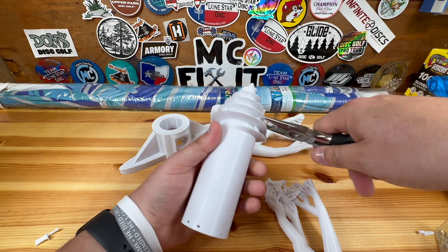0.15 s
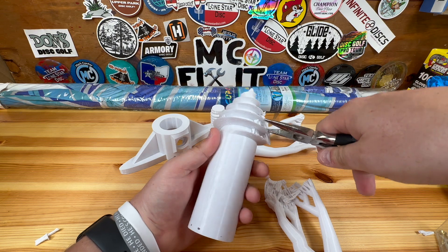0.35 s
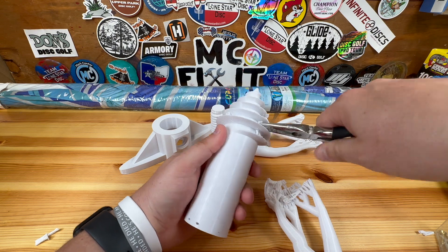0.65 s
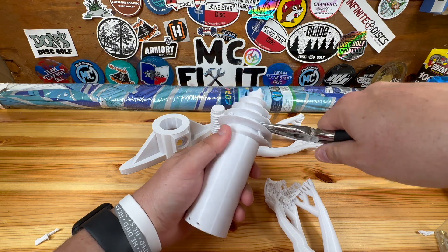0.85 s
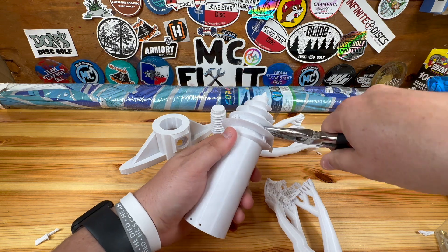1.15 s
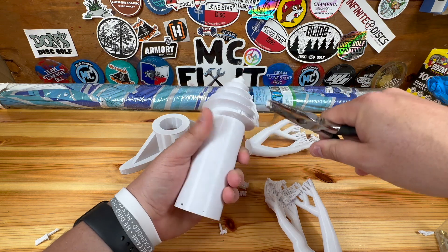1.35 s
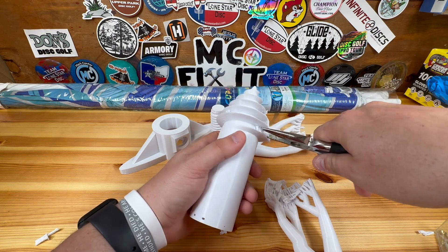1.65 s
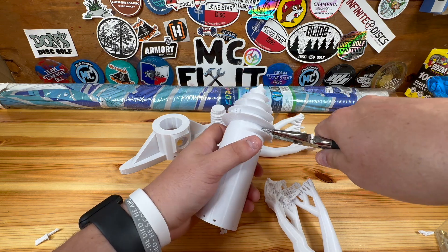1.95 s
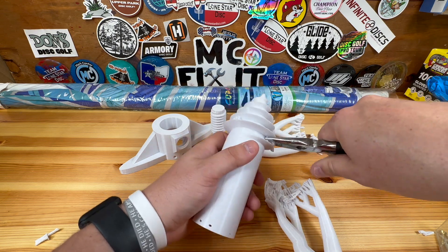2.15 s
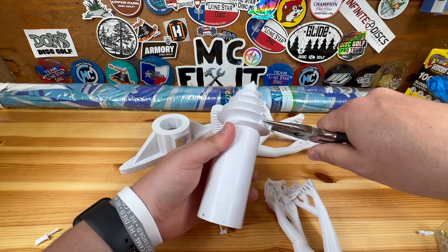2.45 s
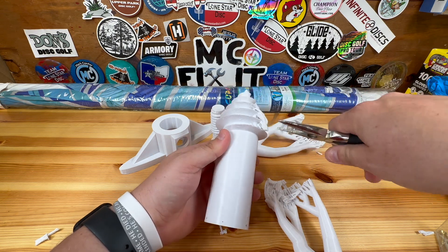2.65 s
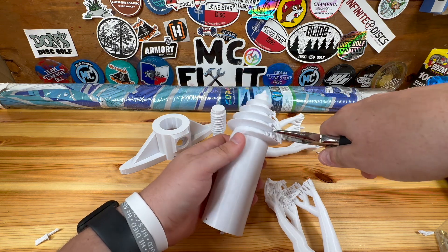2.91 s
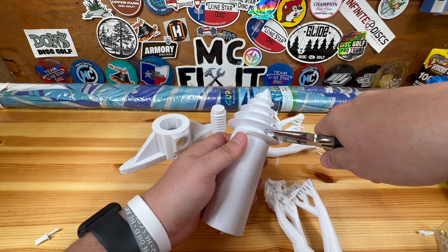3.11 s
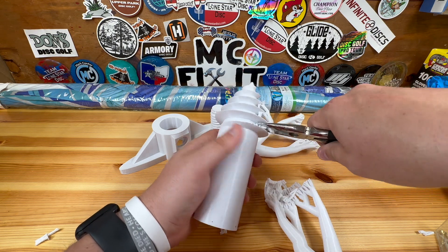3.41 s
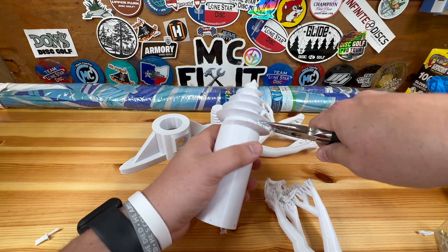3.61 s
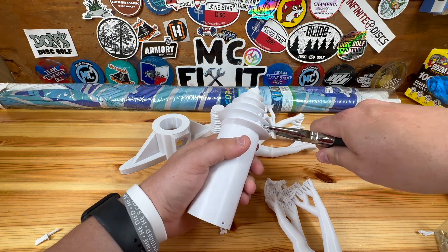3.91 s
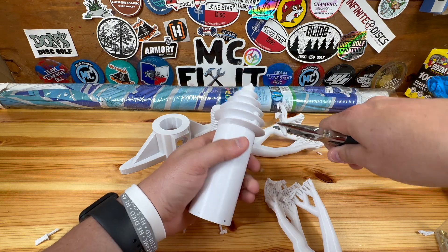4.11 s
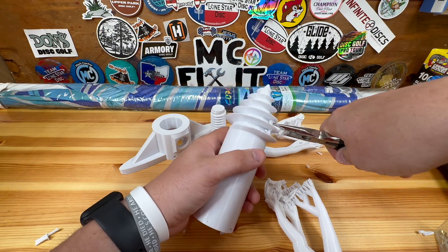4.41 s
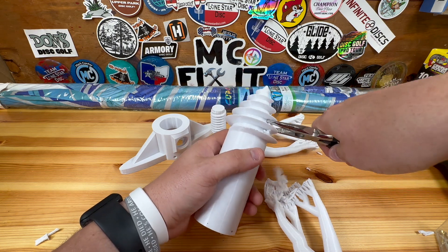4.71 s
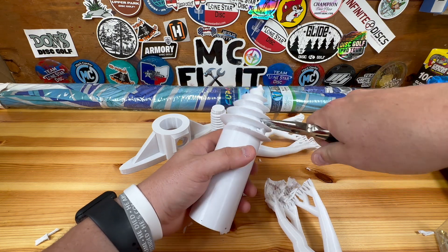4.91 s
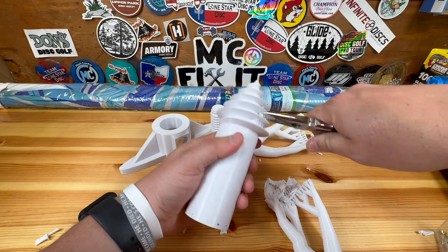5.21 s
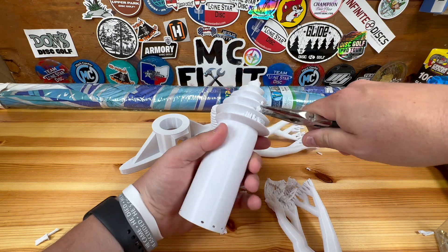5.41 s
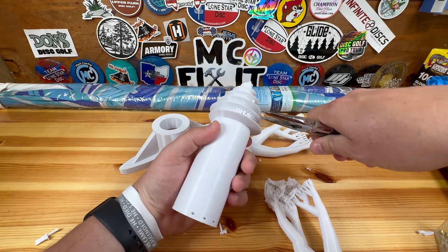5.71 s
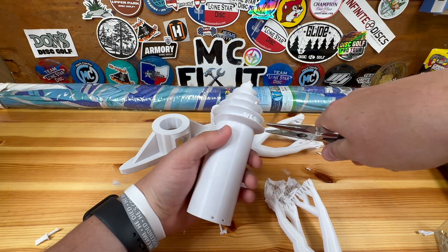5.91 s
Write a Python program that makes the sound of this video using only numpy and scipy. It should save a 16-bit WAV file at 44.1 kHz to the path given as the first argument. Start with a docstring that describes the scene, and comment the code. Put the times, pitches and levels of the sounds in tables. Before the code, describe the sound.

Close stereo pickup at a wooden workbench: pliers bite and twist thin plastic supports off a hollow tube. Quiet ticks come first, then sharp bright snaps in irregular clusters with pauses between, each with a short hollow knock. Jaws scrape over ridges, bent plastic creaks briefly, and loose bits tap. Faint low hum and soft room noise stay underneath, with a short woody echo.

```python
"""Over a faint machine hum and soft room noise, pliers bite, twist and snap brittle plastic
supports off a hollow printed tube, close to a two-port microphone.
Each break is a burst of tiny cracks ringing fins and tube wall; knocks ring the air in the tube.
Stick-slip friction makes the jaws scrape over the ridges and bent supports creak; loose bits tap.
A wooden bench and wall return a short echo, built from decaying noise."""
import sys
import numpy as np
from scipy import signal
from scipy.fft import rfft, irfft
from scipy.io import wavfile
from scipy.ndimage import uniform_filter1d

SR = 44100
rng = np.random.default_rng(int(sys.argv[2]) if len(sys.argv) > 2 else 0)


def voltage_ratio(level):
    """Linear amplitude factor for a level in decibels (scalar or array-like)."""
    return 10 ** (np.asarray(level, float) / 20)


def digitize_waveform(pressure):
    """Quantize a signal to 16-bit integers and store it at the path in sys.argv[1].

    Rows of a 2-D input are taken as channels; values are limited to [-1, 1].
    """
    field = np.atleast_2d(pressure).T
    bounded = np.clip(field, -1, 1)
    quanta = np.round(bounded * 32767).astype(np.int16)
    wavfile.write(sys.argv[1], SR, quanta)


N = 267246

# Source near the plastic: level of left port over right/dB, lead of left port/ms
LEFT_DB, LEFT_LEAD_MS = -1.5, 0.14


def curve(rows):
    """Linear interpolation: the columns of a table as values for every sample."""
    s, *columns = np.transpose(rows)
    return [np.interp(np.arange(N) / SR, s, c) for c in columns]


def through(x, response):
    """Convolution: sound passed through an impulse response."""
    x, response = np.atleast_2d(x), np.atleast_2d(response)
    return signal.fftconvolve(x, response, axes=1)[:, :N]


def colour(x, points):
    """Minimum-phase filtering: a causal filter from the cepstrum of a log gain given as (f/Hz, gain/dB)."""
    hz, db = np.transpose(points)
    size = 4096
    bin_hz = np.arange(size // 2 + 1) * SR / size
    log_gain = np.interp(np.log(bin_hz + 1), np.log(hz), db) * np.log(10) / 20
    cepstrum = irfft(log_gain)
    # folding the negative times onto the positive ones makes it causal
    cepstrum[1:size // 2] *= 2
    cepstrum[size // 2 + 1:] = 0
    return through(x, irfft(np.exp(rfft(cepstrum))))


def unit(x):
    """Normalisation: scaled to rms 1."""
    return x / np.sqrt(np.mean(x ** 2))


def unit_energy(x):
    """Normalisation: each port scaled to energy 1."""
    return x / np.sqrt(np.sum(x ** 2, axis=1, keepdims=True))


def decay(t, t60):
    """Exponential damping: amplitude falls 60 dB in t60 seconds."""
    return np.exp(-np.log(1000) * t / t60)


def walk(rate):
    """Slow random modulation: levels held 1 / rate s and slewed twice; rms 1."""
    k = int(SR / rate)
    steps = np.repeat(rng.standard_normal(N // k + 1), k)
    slewed = uniform_filter1d(uniform_filter1d(steps, k), k)
    return unit(slewed[:N])


def modes(rows, phase_spread=0.3):
    """Modal superposition: damped sines, each with its own phase (spread in rad) at each port; energy 1."""
    t = np.arange(0, max(row[-1] for row in rows), 1 / SR)
    out = 0
    for hz, db, t60 in rows:
        phase = phase_spread * rng.standard_normal((2, 1))
        out = out + voltage_ratio(db) * np.sin(2 * np.pi * hz * t + phase) * decay(t, t60)
    onset = np.minimum(t / 0.00081, 1)
    return unit_energy(out * onset)


def held(rows, detune, spread_db):
    """Perturbed boundary conditions: the same modes, each a little off in pitch, strength and damping."""
    draws = rng.standard_normal((len(rows), 3))
    return [(hz * (1 + detune * p), db + spread_db * g, t60 * voltage_ratio(d))
            for (hz, db, t60), (p, g, d) in zip(rows, draws)]


def swell(ms):
    """Transient force: runs up for ms (at least 0.3), then dies away; peak near 1."""
    x = np.arange(SR // 16) / SR / (max(ms, 0.3) / 1000)
    return (x * np.exp(1 - x)) ** 1.23


def splinters(shape, spread_db):
    """Brittle fracture: dense micro-cracks with a long-tailed spread of sizes; rms 1."""
    return unit(rng.standard_normal(shape) * voltage_ratio(spread_db * rng.exponential(size=shape)))


def stick_slip(rate, spread_db, ms, drag):
    """Stick-slip friction: ridges let go at random, rate per s, with small jerks over a steady drag."""
    released = rng.random(N) < rate / SR
    slips = released * voltage_ratio(spread_db * np.minimum(rng.exponential(size=N), 3.0))
    force = unit(through(slips, swell(ms))[0] + drag)
    return splinters(N, spread_db=2.0) * force


def blow(ms, rows, phase_spread):
    """Impact excitation: a chattering push, rising for ms, drives the modes; energy 1."""
    push = rng.standard_normal(SR // 16) * swell(ms)
    return unit_energy(through(push, modes(rows, phase_spread)))


def add(line, burst, s, pan_db, lead_ms):
    """Level and time difference: places a burst on both ports, pan and lead given for left over right."""
    burst = np.broadcast_to(burst, (2, burst.shape[-1]))
    for port, side in enumerate((1, -1)):
        # nothing starts before 0, so there only the right port's half of the lead remains
        at = max(int(s * SR - side * lead_ms * SR / 2000), 0)
        line[port, at:at + burst.shape[1]] += (burst[port] * voltage_ratio(side * pan_db / 2))[:N - at]


# Spectrum of the room noise, only its shape counts: f/Hz, relative level/dB
ROOM_NOISE = [(15, -29.5), (25, -11.5), (97, -2.5), (146, 0.5), (242, -11), (331, -3.5), (562, -12.5),
              (716, -9), (1050, -32), (1500, -26), (3700, -36.5), (6600, -49.5), (8000, -45.5),
              (17600, -120)]
# Wavering hum tones: f/Hz, rate of wavering/Hz, level/dB
HUM_TONES = [(59.7, 30, -65), (149.9, 24, -58)]
# Level of a further 128 Hz motor tone that sets in late, before its wavering: t/s, level/dB
MOTOR_LEVEL = [(0, -104), (4.7, -100), (5.0, -58), (6.06, -58.5)]


def workshop():
    """Broadband noise and amplitude-modulated tones: soft room noise and narrow wavering hums."""
    mid, side = rng.standard_normal((2, N))
    ports = np.array([[1], [-1]])
    swells_db = 1.9 * walk(4.3)
    out = voltage_ratio(-56.5 + swells_db) * unit(colour(mid + 0.72 * side * ports, ROOM_NOISE))
    t = np.arange(N) / SR
    for hz, width, db in HUM_TONES:
        common = walk(width) * np.sin(2 * np.pi * hz * t)
        opposed = 0.3 * ports * walk(width) * np.cos(2 * np.pi * hz * t)
        out = out + voltage_ratio(db) * np.sqrt(2) * (common + opposed)
    motor_db = curve(MOTOR_LEVEL)[0] + 2.0 * walk(13)
    return out + voltage_ratio(motor_db) * np.sqrt(2) * np.sin(2 * np.pi * 128 * t)


def echo(t60, db):
    """Diffuse reflection: decaying noise, different at each port, fading in over 2.9 ms."""
    t = np.arange(SR // 2) / SR
    tail = rng.standard_normal((2, len(t))) * decay(t, t60) * np.minimum(t / 0.0029, 1)
    return voltage_ratio(db) * unit_energy(tail)


def space():
    """Room impulse response: the direct sound, then bench echo and room tail."""
    reflections = echo(t60=0.06, db=-9) + echo(t60=0.21, db=-17)
    # small clutter scatters the treble more than the bass
    response = signal.lfilter(*signal.butter(1, 1000, "high", fs=SR), reflections)
    response[:, 0] += 1
    return response


# Loose bits and jaw tips tapping the part: t/s, level/dB, f/Hz
TAP_NOTES = [(.126, -52, 2200), (0.356, -47, 1360), (0.522, -41, 2320), (1.852, -49.5, 1800),
             (2.828, -37.5, 2230), (2.845, -29.5, 2440), (2.854, -44, 2390), (2.866, -39, 2590),
             (2.973, -32.5, 2385), (2.999, -35, 2130), (4.89, -34.5, 4040), (5.783, -37.5, 1127),
             (5.847, -42.5, 2810), (5.897, -39.5, 1125), (5.933, -47, 1980), (5.951, -54.5, 1460),
             (5.984, -47.5, 2300), (6.017, -47, 1300), (6.027, -44, 2520)]


def taps():
    """Impact on a damped resonator: each quick contact rings a close pair of modes."""
    contact_ms, t60 = 0.91, 0.021
    out = np.zeros((2, N))
    for s, db, hz in TAP_NOTES:
        note = blow(contact_ms, [(hz, 0, t60), (1.1 * hz, -4, t60)], 0.53)
        note = note * voltage_ratio(db) / np.abs(note).max()
        add(out, note, s - contact_ms / 1000, LEFT_DB, LEFT_LEAD_MS)
    return out


# Creaks of a bent support: start t/s, length/s, level/dB
CREAK_TIMES = [(3.082, 0.082, -52.5), (4.005, 0.015, -40), (4.704, 0.0364, -34), (4.745, .07, -46),
               (4.815, 0.018, -28), (4.865, 0.041, -39)]
# Modes of the support: f/Hz, relative level/dB, t60/s
SUPPORT_MODES = [(1402, 2.5, 0.058), (1570, -5.5, 0.054), (2497, -10, 0.035)]


def creaks():
    """Stick-slip oscillation: quick jerks, strongest near the start, ring the bending support."""
    force, t = np.zeros((2, N)), np.arange(N) / SR
    for s, length, db in CREAK_TIMES:
        fade = np.clip(np.minimum((t - s) / 0.0027, (s + length - t) / length), 0, 1)
        jerks = stick_slip(260, spread_db=4.0, ms=1.2, drag=0.6)
        add(force, voltage_ratio(db) * fade * jerks, 0, LEFT_DB, LEFT_LEAD_MS)
    return through(force, modes(SUPPORT_MODES))


# Jolts of the tube: t/s near the peak, relative level/dB, thud of the hand over it/dB
JOLTS = [(0.041, -45, 8), (.128, -40.5, 6.5), (.176, -49, 9), (0.205, -25.5, -13), (.4298, -39.5, -19),
         (0.4861, -35.5, 5), (0.6371, -35.5, 2.5), (0.6604, -25.5, -43), (0.8655, -17.5, -7.5),
         (0.9856, -29.5, -17), (1.0922, -14.5, -39), (1.1884, -16, -36), (1.2524, -33, -9),
         (1.6072, -36, -14), (1.6785, -38.5, 10.5), (1.855, -48, 4.5), (2.009, -31.5, -3),
         (2.0269, -13, -28.5), (2.1319, -21.5, -12), (2.18, -21.5, -32), (2.1903, -23, -4.5),
         (2.833, -42.5, 9.5), (2.9774, -39, 9), (3.0056, -30, -5.5), (3.1814, -32, -2), (3.2409, -21, -7.5),
         (3.3866, -22.5, -12), (3.578, -31, -35), (3.611, -29, -13), (3.6229, -11.5, -34.5),
         (3.7334, -20.5, -31.5), (3.7522, -19, -3), (3.7924, -28.5, -24), (4.429, -49, 6), (4.4988, -36, 0),
         (4.592, -42.5, -17), (4.613, -38.5, 5.5), (4.7535, -32, 1), (4.765, -25.5, -11),
         (4.8318, -29, -8.5), (5.0824, -22.5, -44), (5.1213, -22, -7), (5.205, -24, -35), (5.226, -35, 6),
         (5.2607, -34.5, 1.5), (5.4509, -35.5, -3.5), (5.938, -48.5, 12), (5.9909, -40.5, 6),
         (6.0198, -32.5, -0.5)]
# Air column in the tube: f/Hz, relative level/dB, t60/s
AIR_COLUMN = [(505, -12, .035), (640, 1, 0.07), (680, 2, 0.05), (712, 11, 0.082), (775, -3, 0.03)]
# Bench and hand: f/Hz, relative level/dB, t60/s
BENCH_AND_HAND = [(257, -1, 0.11), (317.8, 11.5, 0.056), (447.5, 10, 0.027)]


def tube(rub):
    """Air-column resonance: jolts and the drag of the jaws ring the tube, and jolts thump the hand."""
    contact_ms, lead_ms, air_pan_db = 2.13, 0.15, 4.0
    ring = np.zeros((2, N))
    for s, db, thud_db in JOLTS:
        start = s - 2.726 * contact_ms / 1000
        parts = ((AIR_COLUMN, db + 20.5, air_pan_db, 0.3),
                 (BENCH_AND_HAND, db + thud_db + 18.5, 0.3, 0.9))
        for rows, part_db, pan_db, phase_spread in parts:
            # the grip shifts, so no two jolts ring alike
            gripped = held(rows, detune=0.012, spread_db=1.5)
            add(ring, blow(contact_ms, gripped, phase_spread) * voltage_ratio(part_db), start, pan_db, lead_ms)
    drag = np.zeros((2, N))
    add(drag, rub * voltage_ratio(-20), 0, air_pan_db, lead_ms)
    ring = ring + through(drag, modes(AIR_COLUMN))
    # the ring keeps only the band from 130 Hz to 1100 Hz
    return signal.sosfilt(signal.butter(2, (130, 1100), "band", fs=SR, output="sos"), ring)


def fin_ring(rows):
    """Direct plus resonant radiation: the bare crack followed by the ring of the fins."""
    rings = voltage_ratio(-18.0) * modes(rows)
    rings[:, 0] += 1
    return rings


# Breaks and ticks: t/s at the peak of the force, relative crack level/dB, wall ring over crack/dB,
# tearing time/ms
BREAKS = [(0.126, -47.5, 11, 1.8), (0.198, -40.5, 2, 1.7), (0.234, -47, 7, 3.2), (0.3609, -41, 6.5, 2.7),
          (0.482, -44.5, 10.5, 2.9), (0.576, -53, 13, 2.1), (0.6338, -32, -4, 2.7), (0.6549, -34.5, 9, 3.1),
          (0.8603, -34.5, 5.5, 2.95), (0.98, -47.5, 8, 1.7), (1.053, -46.5, -19, 2.9),
          (1.087, -10.5, -3, 1.9), (1.1035, -10.5, -1, 1.2), (1.1835, -7, -8, 1.33), (1.408, -45, -6, 2.2),
          (1.5918, -38, -1.5, 0.63), (1.6227, -41, -1, 4.8), (1.671, -49, 12, 2.8),
          (1.9864, -43.5, 14.5, 4.6), (2.001, -42, -1, 4.6), (2.0231, -14.5, 0, 1.94),
          (2.129, -8.5, -3, 3.5), (2.177, -11.5, -1, 2.5), (2.184, -8.5, -12, 2.3), (2.261, -31, -28, 1.3),
          (2.2842, -36, -33, 3.2), (2.3365, -26, -12, 2.1), (2.3419, -22.5, -35, 1.45),
          (2.27, -33, -30, 0.74), (2.3593, -34.5, -18, 3.1), (2.391, -44.5, -21, 3.1),
          (2.427, -51, -15, 2.1), (2.561, -43, 2, 2.35), (2.777, -38.5, -4, 3.1), (2.8449, -35, -15, 1.66),
          (2.867, -37, 3, 1.8), (2.959, -36, -15, 1.15), (2.9988, -32, 3, 0.84), (3.118, -35.5, -7, 1.9),
          (2.946, -39.5, -13, 1.6), (3.153, -33.5, -6, 2), (3.1743, -20, -12, 1.76), (3.186, -31, -10, 4),
          (3.198, -18.5, -5, 1.5), (3.2232, -23, 0, 3.7), (3.229, -9.5, -14, 1.6), (3.2392, -10, -7, 2.5),
          (3.348, -33, -26, 2.9), (3.3833, -9, -2.5, 3.3), (3.5739, -18.5, -13, 1.7),
          (3.6075, -13.5, 3.5, 1.16), (3.618, -12, 0.5, 2.1), (3.642, -24, -19, 3.1),
          (3.7313, -12.5, 0, 2.3), (3.751, -17.5, -10, 8.7), (3.7872, -19.5, -26, 2.64),
          (3.914, -39, -25, 1.2), (3.933, -28.5, -39, 2.1), (3.9462, -21.5, -41, 1.5),
          (3.955, -25, -23, 2.5), (3.966, -27.5, -28, 2.6), (3.986, -25, -22, 4.1), (4.006, -33, -12, 1.5),
          (4.046, -52, -2, 2.5), (4.1159, -35, -5.5, 1.3), (4.2244, -34, -14, 3.3),
          (4.294, -49.5, -14, 3.8), (4.408, -48, -9, 1.8), (4.426, -49.5, -3, 2.5), (4.489, -36.5, -4, 1.5),
          (4.523, -40, -14, 3.2), (4.608, -49.5, 15.5, 4.2), (4.7096, -28, -1, 2.4), (4.818, -41, -10, 1.8),
          (4.83, -35, -7, 2.06), (5.0005, -37, -7, 2.8), (5.0792, -10, -7.5, 1.55), (5.111, -36, 9, 1.2),
          (5.119, -13.5, -17, 2.5), (5.129, -28, 3.5, 3.3), (5.2002, -11, -6, 1.88),
          (5.2097, -16.5, -10, 2.17), (5.2222, -14.5, -5, 1.07), (5.2384, -13.5, -12, 1.5),
          (5.2551, -14, -7, 3.14), (5.3181, -28, -4, 3.3), (5.384, -41, -20, 1.8), (5.407, -30, -12, 2.2),
          (5.423, -31.5, -23, 2.5), (5.4492, -13.5, -14.5, 1.7), (5.4625, -20.5, -5.5, 3.8),
          (5.48, -28.5, -20, 2.8), (5.506, -23.5, -12, 0.57), (5.521, -34, -15, 2.7), (5.57, -42, -6, 3.5),
          (5.691, -46.5, -10.5, 5.1), (5.7826, -45.5, 5.5, 2.45), (5.898, -49, 5, 6.5)]
# Jaws and fingers rubbing the ridges, before random swells: t/s, relative level/dB
RUB_LEVEL = [(0, -60.5), (1.04, -77), (1.57, -77), (1.62, -57), (1.85, -68.5), (1.96, -86), (2.0, -49.5),
             (2.35, -52.5), (2.47, -64), (2.56, -41.5), (2.72, -100.5), (2.85, -49), (3.1, -50.5),
             (3.89, -61.5), (3.97, -43), (4.07, -58), (4.33, -65), (4.4, -52.5), (4.53, -53), (4.68, -70.5),
             (4.74, -37.5), (4.89, -46.5), (4.94, -65), (5.05, -87), (5.37, -52), (5.58, -56),
             (5.72, -71.5), (5.85, -68.5), (6.0, -51.5)]
# Spectrum of the cracks: f/Hz, relative gain/dB
CRACK_SPECTRUM = [(1940, -39.5), (3300, -23), (3590, -17), (4060, -4.5), (6730, 1), (7570, -4.5),
                  (9250, -3.5), (9890, -5), (12500, -27.5), (16200, -63), (22000, -120)]
# Thin fins: f/Hz, bandwidth/Hz, relative level/dB
FIN_BANDS = [(4840, 2700, 4.5), (9200, 280, -3), (9650, 140, 1.5)]
# Tube wall, lower and higher modes: f/Hz, relative level/dB, t60/s
LOW_WALL_MODES = [(1351, 0.5, 0.031), (1482, 0.5, 0.02), (1612, 0.5, 0.024), (1800, 0.5, 0.032),
                  (2040, -5.5, 0.015)]
HIGH_WALL_MODES = [(2340, 4.5, 0.011), (2805, 3, 0.012), (3080, -1, 0.012)]


def pliers():
    """Fracture and friction ring the fins and the wall modes; also gives the drag on the tube."""
    low_db = -10.5
    # after a break the jaws slide on and splinters crackle, fading
    after_db, after_t60 = -18, 0.13
    # a faint hiss swells briefly into each break
    hiss_db, hiss_t60 = -18, 0.035
    fins, walls = np.zeros((2, 2, N))
    bursts = splinters((len(BREAKS), SR // 16), spread_db=3.5)
    places = rng.standard_normal((len(BREAKS), 2))
    # a resonance of bandwidth B decays with t60 = ln(1000) / (pi B)
    fin_modes = [(hz, db, np.log(1000) / (np.pi * width)) for hz, width, db in FIN_BANDS]
    t = np.arange(N) / SR
    hiss_level = 0
    pressure = voltage_ratio(curve(RUB_LEVEL)[0] + 3.3 * walk(24.705))
    for (s, db, wall_db, ms), burst, (shift, thin) in zip(BREAKS, bursts, places):
        shape = swell(ms)
        # the break frees a set energy, however the splinters fall
        burst = burst * shape
        burst = burst * voltage_ratio(db) * np.sqrt(np.sum(shape ** 2) / np.sum(burst ** 2))
        # thinner fins crack brighter, thicker ones duller
        tilt = np.tanh(0.5 * thin)
        crack = (burst - tilt * np.roll(burst, 1)) / np.sqrt(1 + tilt ** 2 - tilt)
        # every break sits elsewhere on the part and rings its own mix of modes
        low, high, fin = (held(rows, detune=0.02, spread_db=2.5)
                          for rows in (LOW_WALL_MODES, HIGH_WALL_MODES, fin_modes))
        low_ring = voltage_ratio(wall_db + low_db) * through(burst, modes(low))[:, :len(burst)]
        # the high wall modes follow the ring of the low ones only in part
        high_ring = voltage_ratio(0.54 * wall_db - 9) * through(burst, modes(high))[:, :len(burst)]
        lead_ms = LEFT_LEAD_MS + 0.08 * shift
        add(fins, through(crack, fin_ring(fin)), s - ms / 1000, LEFT_DB, lead_ms)
        add(walls, low_ring + high_ring, s - ms / 1000, LEFT_DB, lead_ms)
        pressure = pressure + (t > s) * voltage_ratio(db + after_db - 60 * abs(t - s) / after_t60)
        hiss_level = hiss_level + (t <= s) * voltage_ratio(db + hiss_db - 60 * abs(s - t) / hiss_t60)
    # the jaw tips scratch the fins, their flanks drag on the wall; the hiss joins both
    tips, rub = (stick_slip(110, spread_db=6.0, ms=1.7, drag=0.56) * pressure
                 + hiss_level * splinters(N, spread_db=2.0) for _ in range(2))
    add(fins, through(tips, fin_ring(fin_modes[:1])), 0, LEFT_DB, LEFT_LEAD_MS)
    low_drag = voltage_ratio(low_db) * through(rub, modes(LOW_WALL_MODES))
    high_drag = voltage_ratio(-10.5) * through(tips + rub, modes(HIGH_WALL_MODES))
    add(walls, (low_drag + high_drag) * voltage_ratio(-6), 0, LEFT_DB, LEFT_LEAD_MS)
    return voltage_ratio(3.0) * colour(fins, CRACK_SPECTRUM) + walls, rub


def scene():
    """Superposition: near sources convolved with the space, over the hum and room noise."""
    cracks, rub = pliers()
    near = cracks + tube(rub) + creaks() + taps()
    return through(near, space()) + workshop()


def low_pass(x):
    """Removes everything above the highest recorded frequency."""
    return signal.sosfilt(signal.butter(12, 13030, fs=SR, output="sos"), x)


# Colour of the left port over the right: f/Hz, gain/dB
PORT_COLOUR = [(60, 0), (300, -0.5), (2000, 3), (5000, 5.5), (8000, 7), (10000, -3), (13000, -2)]


def record(dry):
    """Linear filtering and saturation: ports differ in colour, the top is cut, loud peaks are rounded."""
    ports = []
    for port, side in zip(dry, (1, -1)):
        ports.append(colour(port, [(hz, side * db / 2) for hz, db in PORT_COLOUR]))
    top_cut = signal.cheby1(5, 0.3, 10130, fs=SR, output="sos")
    mix = np.tanh(1.2 * signal.sosfilt(top_cut, np.vstack(ports)))
    return low_pass(mix)


dry = scene()
out = record(dry)
digitize_waveform(out)
```